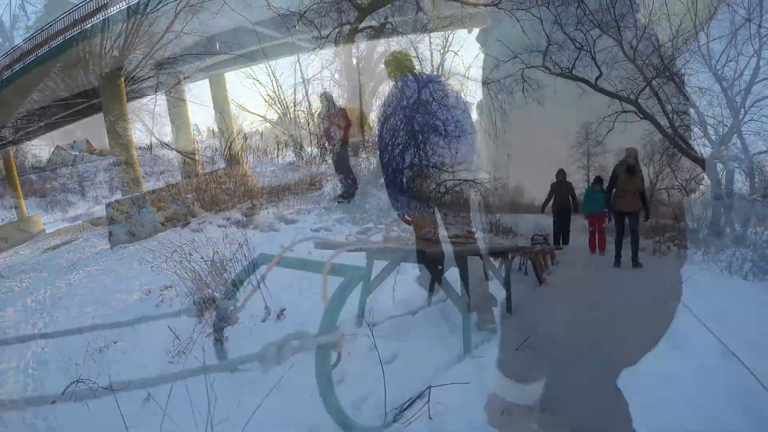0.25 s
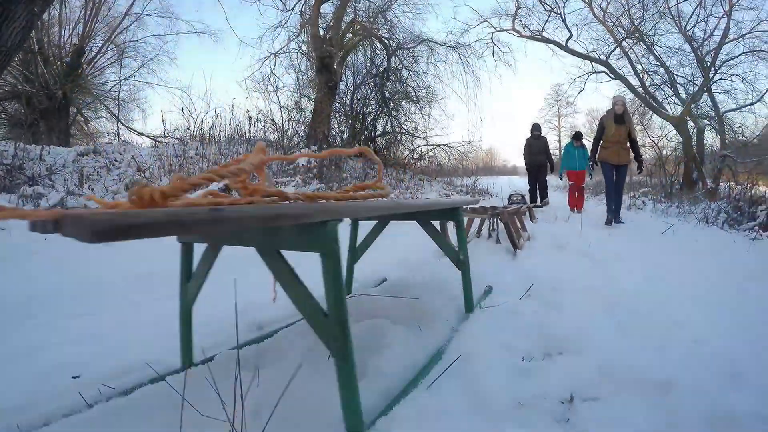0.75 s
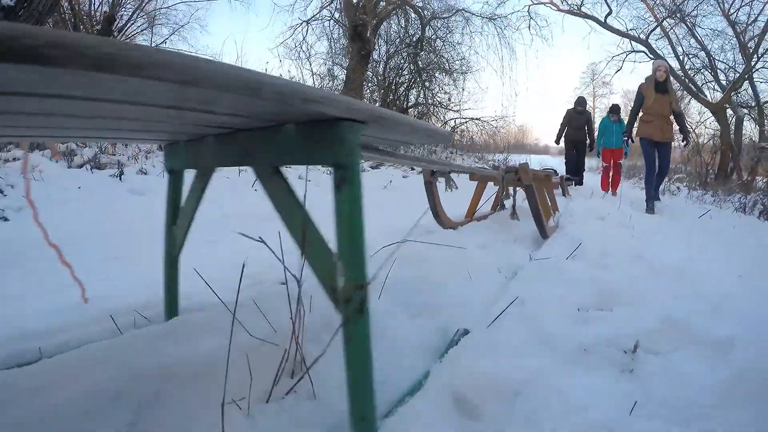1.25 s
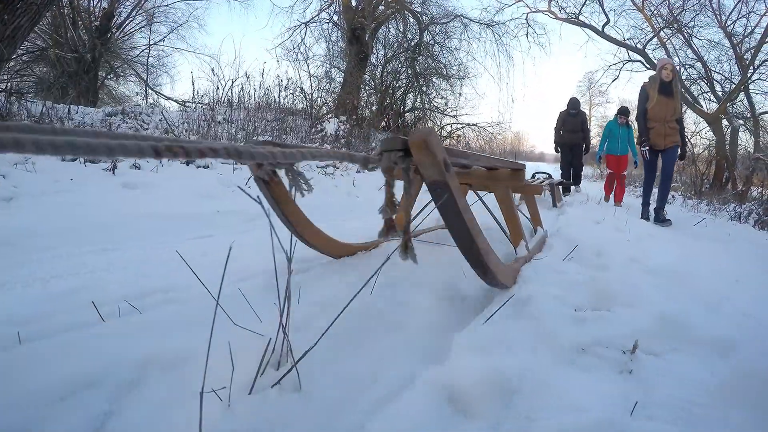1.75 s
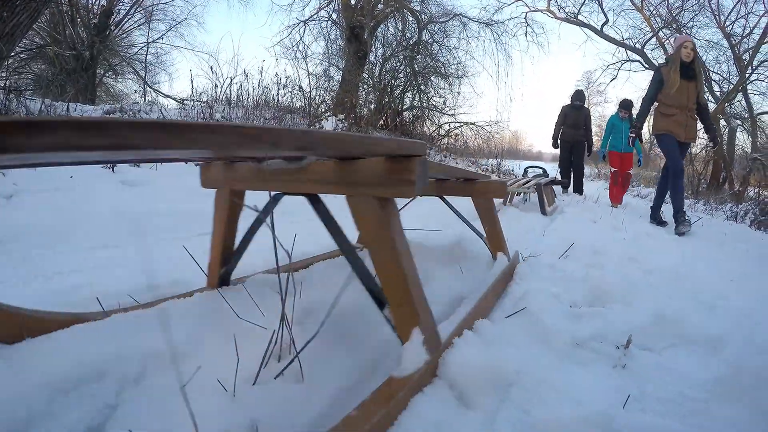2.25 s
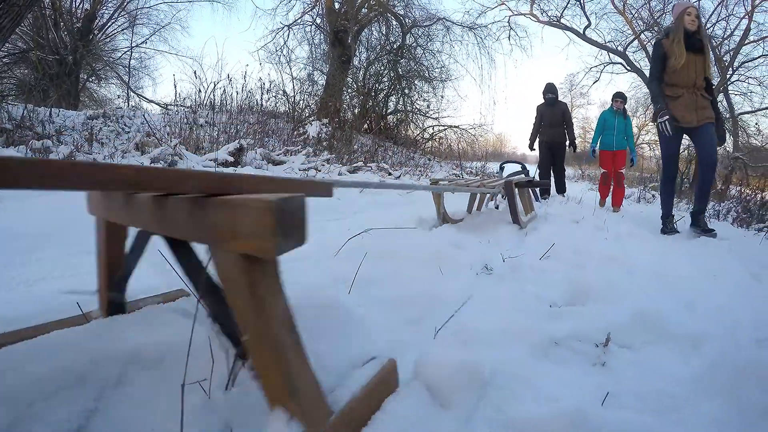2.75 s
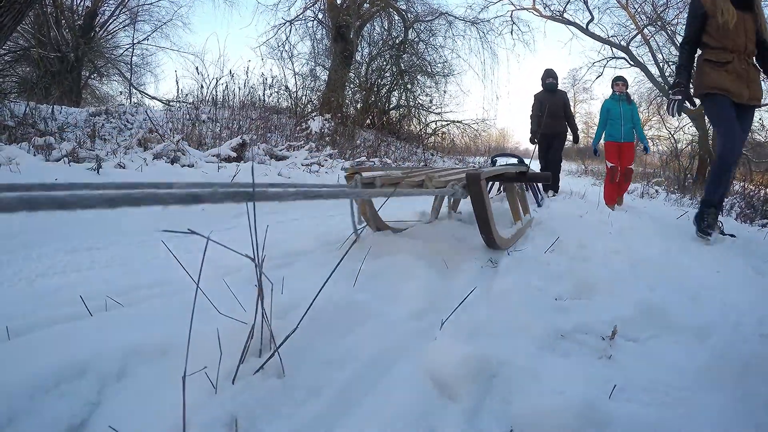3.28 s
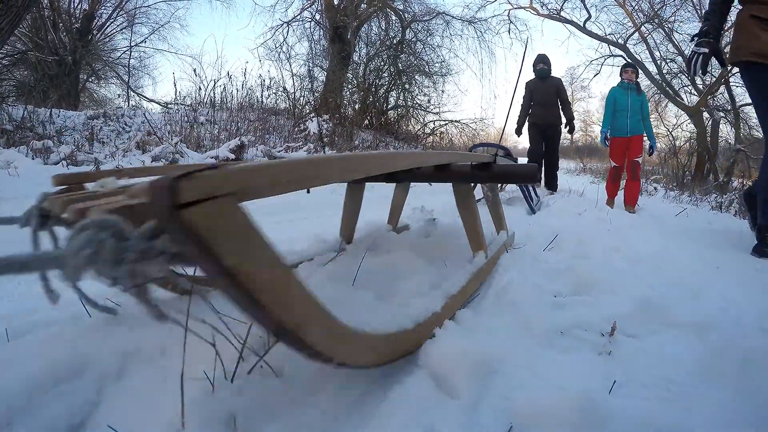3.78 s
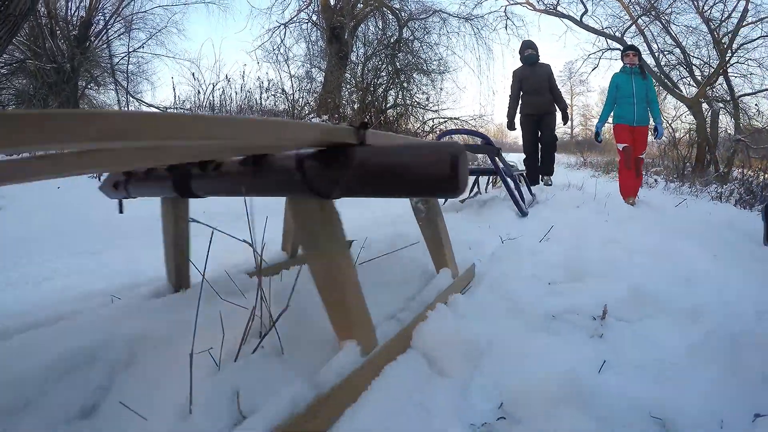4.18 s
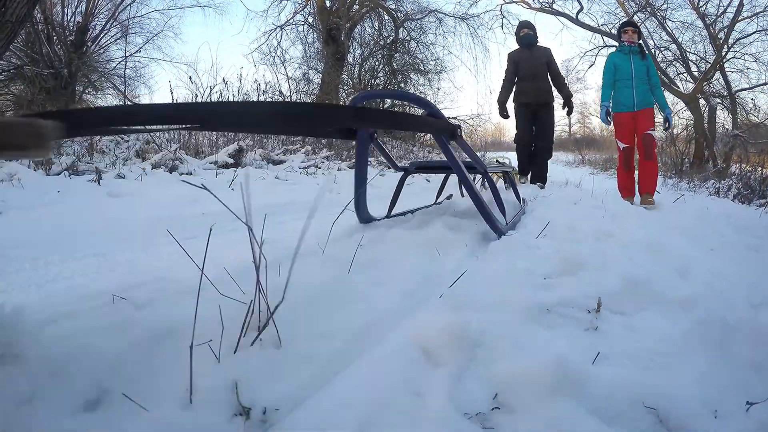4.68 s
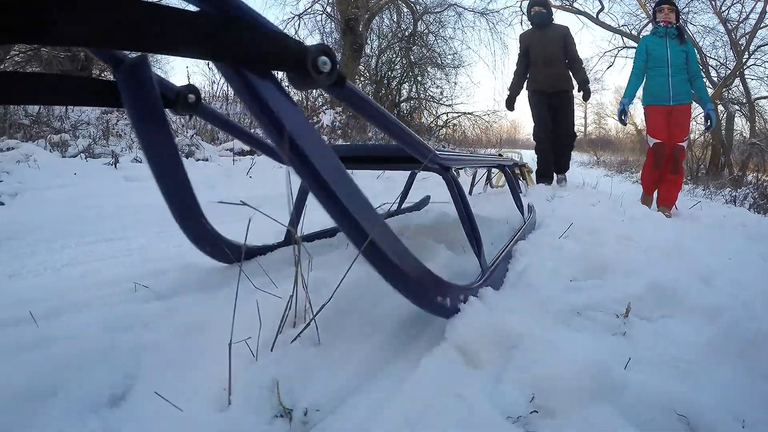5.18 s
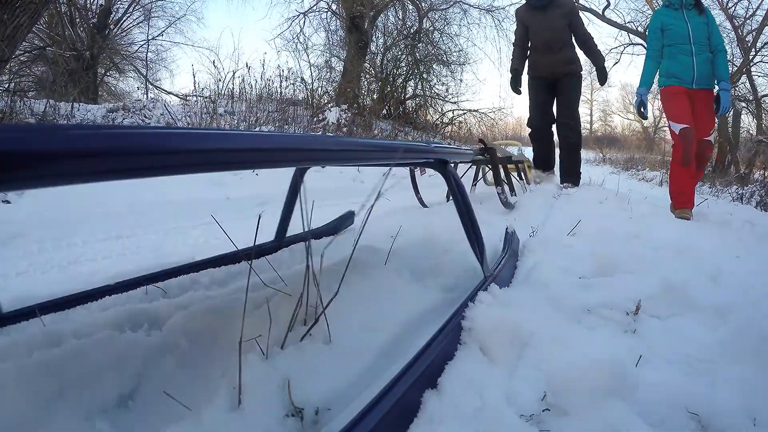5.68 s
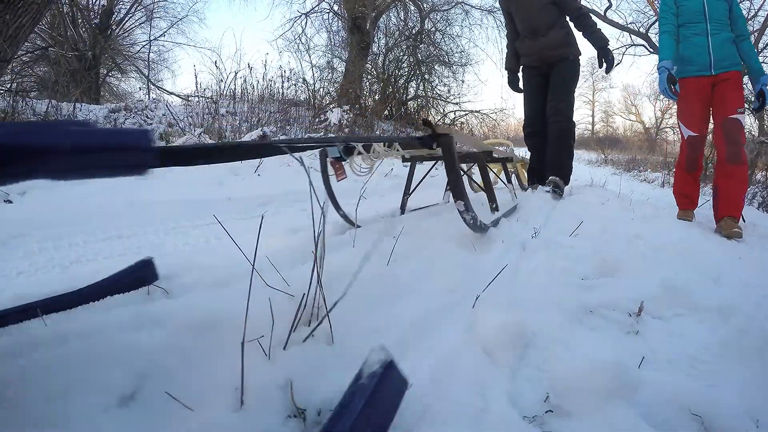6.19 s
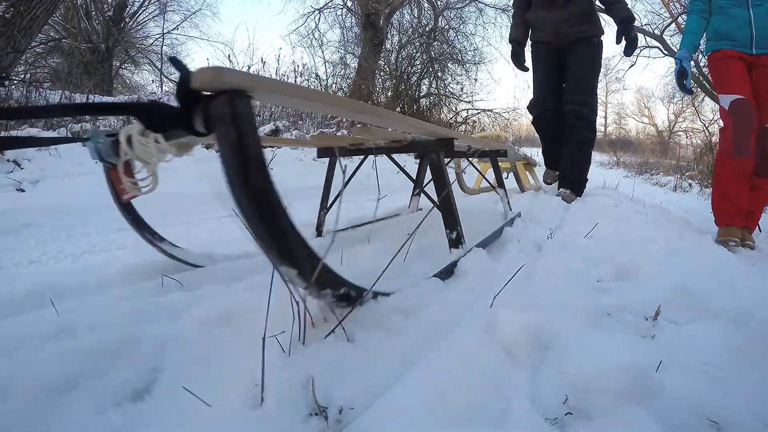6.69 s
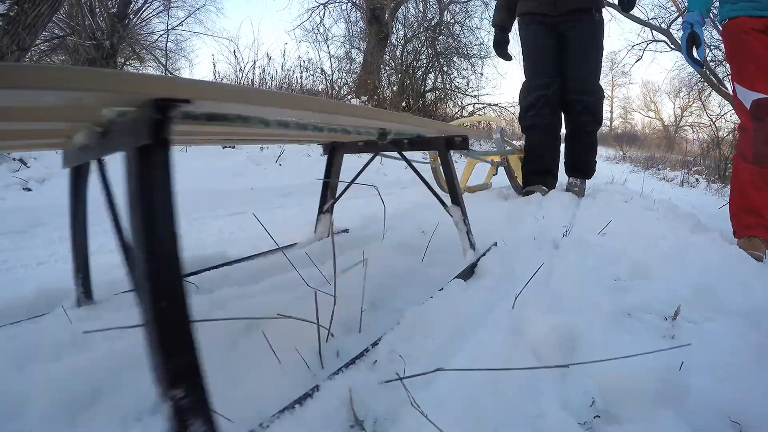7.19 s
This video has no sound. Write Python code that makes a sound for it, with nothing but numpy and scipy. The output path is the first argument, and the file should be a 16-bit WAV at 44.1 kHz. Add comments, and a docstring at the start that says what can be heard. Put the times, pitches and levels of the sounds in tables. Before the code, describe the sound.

A train of sleds drags across snow, grinding in uneven surges and crackling crunches over low bouncing rumble, with brief dropouts and one thin rising rasp.

```python
"""Snow grains crushed under runners and boots, heard from inside the closed plastic case of a small camera
that rides low over snow beside a train of sleds: noise forces shake the case, which rings in its own modes.
Below, the springy mount bounces and drums, with harder bumps; the contact breaks now and then.
Further off, runners hiss through the air as smooth noise bands. A low wavering sine hums at the start
and fades out; in a later pause a thin noise band rasps and glides upward."""
import sys
import numpy as np
from scipy import signal
from scipy.fft import rfft, irfft, next_fast_len
from scipy.io import wavfile
from scipy.ndimage import uniform_filter1d

SR = 44100
rng = np.random.default_rng(int(sys.argv[2]) if len(sys.argv) > 2 else 0)


def to_wav(sig):
    """Store sig (one row per channel, or 1-D mono) as 16-bit WAV at the path in sys.argv[1].

    Samples outside -1..1 are clipped; the rate is SR.
    """
    pcm = np.clip(np.atleast_2d(sig), -1, 1) * 32767
    pcm = np.round(pcm).astype(np.int16)
    wavfile.write(sys.argv[1], SR, pcm.T)  # frames by channels


N = 328104
T = np.arange(N) / SR  # time [s]
OPPOSED = np.array([[1], [-1]])  # opposite signs at the two microphone ports


def undb(db):
    """Amplitude factor of a level in dB."""
    return 10 ** (np.asarray(db) / 20)


def unit(x):
    """A signal scaled to rms 1."""
    return x / np.sqrt(np.mean(x ** 2))


def curves(table):
    """Columns of a table joined by straight lines in time."""
    times, *columns = np.transpose(table)
    return [np.interp(T, times, column) for column in columns]


def walk(rate):
    """Random levels, rms 1, held for 1 / rate seconds and smoothed twice over that span."""
    hold = int(SR / rate)
    steps = np.repeat(rng.standard_normal(N // hold + 1), hold)
    slewed = uniform_filter1d(uniform_filter1d(steps, hold), hold)
    return unit(slewed[:N])


def response(modes, sharp):
    """Complex gain of a set of modes; neighbours alternate in sign, sharp > 1 darkens the valleys."""
    f = np.fft.rfftfreq(next_fast_len(N + SR), 1 / SR) + 1e-3  # the offset avoids dividing by zero
    gain = 0
    for k, (hz, width, db) in enumerate(modes):
        detuning = (f / hz - hz / f) * hz / width
        gain = gain + (-1) ** k * undb(db) / (1 + 1j * detuning / sharp) ** sharp
    return gain


def ring(force, modes, sharp):
    """A force played through modes, scaled so that white noise of rms 1 comes out at rms 1."""
    gain = response(modes, sharp)
    size = next_fast_len(N + SR)
    rung = irfft(rfft(force, size) * gain, size)[..., :N]
    return rung / np.sqrt(np.mean(abs(gain) ** 2))


def knock(pushes, modes, sharp):
    """Single pushes played through modes, scaled so that a push of 1 rings with peak 1."""
    single = 1. * (T == 0)
    return ring(pushes, modes, sharp) / abs(ring(single, modes, sharp)).max()


def grains(rate, scatter_db, smear_s, bed):
    """Crushed grains: short noise puffs of unequal size over a smooth sliding hiss."""
    # the power of each puff scatters by up to scatter_db either way
    sizes = undb(2 * scatter_db * (2 * rng.random(N) - 1))
    hits = (rng.random(N) < rate / SR) * sizes
    power = signal.lfilter([1], [1, -np.exp(-1 / (smear_s * SR))], hits)
    return unit(np.sqrt(bed + power / power.mean()) * rng.standard_normal(N))


# moments when the contact with the snow breaks: (weakest moment [s], length [s], depth [dB])
CONTACT_LIFTS = [(0.704, 0.094, -10), (0.958, 0.099, -11), (1.091, 0.083, -5.5), (1.557, 0.17, -7.5),
                 (1.92, 0.25, -5), (2.475, 0.21, -20), (2.698, 0.089, -1), (2.786, 0.042, -6),
                 (2.892, 0.053, -11), (3.148, 0.05, -9), (3.299, 0.065, -7.5), (3.677, 0.15, -9.5),
                 (3.803, 0.07, -15.5), (3.887, 0.095, -19), (4.528, 0.061, -18), (4.558, 0.044, -6),
                 (4.649, 0.049, -4.5), (4.801, 0.018, -8), (4.962, 0.16, -7.5), (5.334, 0.3, -18.5),
                 (5.59, 0.065, -1.5), (5.746, 0.086, -13.5), (5.968, 0.091, -24), (6.04, 0.033, -8),
                 (6.304, 0.039, -20), (7.308, 0.11, -10.5)]
LIFT_FALL_SHARE = 0.55  # part of a lift spent falling


def lifts():
    """Loss of contact in dB: each lift falls to its weakest moment and climbs back."""
    loss_db = 0
    for s, length, db in CONTACT_LIFTS:
        start = s - length * LIFT_FALL_SHARE
        end = s + length * (1 - LIFT_FALL_SHARE)
        loss_db = loss_db + np.interp(T, [start, s, end], [0, db, 0])
    return loss_db


# boot scuffs that throw up fine powder: (loudest moment [s], length [s], swell [dB])
BOOT_SCUFFS = [(0.105, 0.087, 5), (0.337, .14, 7.5), (0.468, .1, 4), (.61, 0.12, 2.5), (0.835, 0.1, 1.5),
               (1.196, 0.26, 4), (1.55, 0.079, -2), (1.784, .12, 8), (2.2, 0.21, 9), (2.455, 0.092, 7),
               (7.38, .14, 5)]


def scuffs():
    """Swell in dB of the boot scuffs, each a smooth rise and fall."""
    swell_db = 0
    for s, length, db in BOOT_SCUFFS:
        swell_db = swell_db + db * np.cos(np.pi * np.clip((T - s) / length, -.5, .5)) ** 2
    return swell_db


# sudden crunches: (time [s], force level [dB], treble re the scrape's colour [dB])
SNOW_CRUNCHES = [(0.663, -17.5, -22), (0.735, -10.5, -25), (0.769, -14.5, -21), (0.824, -12, -1.5),
                 (.87, -22.5, 12), (1.012, -13, -4), (1.034, -7, -4), (1.174, -9, -2.5), (2.761, -15.5, -1),
                 (2.845, -17, -6), (2.888, -22, 0), (3.163, -33, -3), (3.725, -9, -6), (3.812, -15, -10),
                 (3.931, -13, -24), (4.811, -13, 10.5), (4.835, -4, 2.5), (5.063, -6, 1), (5.628, -12, -5),
                 (5.992, -24, -2), (6.021, -17, -4), (6.064, -27, 5.5), (6.096, -22.5, -1.5),
                 (6.155, -30, 4), (6.276, -28, 3), (6.289, -25, 3), (6.333, -16, -5), (6.615, -20, 8),
                 (6.739, -23, 0), (7.162, -25, 2)]
CRUNCH_T60_S, CRUNCH_RISE_S = 0.023, 0.0011


def crunches():
    """Force of the crunches on the low and high modes: noise that builds at once and dies away."""
    shapes = np.zeros((2, N))
    for s, db, treble_db in SNOW_CRUNCHES:
        start = int(s * SR)
        age = T[start:] - s
        shape = undb(db - 60 * age / CRUNCH_T60_S) * (1 - np.exp(-age / CRUNCH_RISE_S))
        shapes[:, start:] += shape * undb([[0], [treble_db]])
    return shapes / 3 * rng.standard_normal(N)  # 3: peak over rms of a noise puff


# drag of the snow on the case, also felt by the mount: (time [s], scrape [dB], bounce of the mount [dB])
SNOW_DRAG = [(0, -59.5, -34), (.3, -52.5, -34), (.65, -47, -28), (.69, -45, -13), (.75, -38, -18.5),
             (.9, -31.5, -23), (1.03, -28, -14.5), (1.2, -37.5, -24.5), (1.37, -52.5, -32),
             (1.78, -46.5, -31.5), (2.06, -42.5, -38.5), (2.36, -42.5, -37), (2.7, -50.5, -34),
             (3.04, -33, -26.5), (3.1, -39.5, -21), (3.32, -38.5, -27.5), (3.42, -35.5, -20.5),
             (3.75, -30.5, -19), (3.95, -31, -24.5), (4.21, -20.5, -16.5), (4.45, -30, -25.5),
             (4.6, -41.5, -29), (4.79, -31.5, -22.5), (4.83, -28.5, -22), (5.2, -32.5, -23),
             (5.55, -32.5, -27.5), (5.72, -39, -31), (5.8, -33.5, -24), (5.92, -36, -30.5),
             (6.03, -46.5, -30), (6.12, -61, -43.5), (6.28, -55.5, -37), (6.35, -39.5, -27),
             (6.8, -31, -27.5), (6.94, -36, -25.5), (6.98, -42.5, -28), (7.12, -51, -38),
             (7.44, -46, -33.5)]
# colour of the scrape as wood, steel and loose snow take turns: (time [s], ring near 2 kHz [dB re scrape],
# crisp grains [dB re scrape], drumming of the shell [dB re scrape], slow rocking of the mount [dB re bounce])
SCRAPE_COLOUR = [(0, -4, -2, -4, -8), (.4, 1, 6.5, -6, -12), (.85, -5.5, -3.5, -5, -6.5),
                 (1.03, -1.5, -7, 1, -10), (1.25, 1, 3.5, 2, -8.5), (1.7, -3.5, -2.5, 6.5, -6),
                 (2.2, -10.5, -17, -2.5, 3.5), (2.55, -7, -6.5, 5, -2.5), (3.3, -6, -9.5, 11, -15),
                 (3.75, -10, -14.5, 6.5, -19), (4.2, -12, -12, -1, -14), (4.65, -8.5, -7, 4, -10),
                 (4.85, -4, -3.5, -0.5, -15), (5.15, -1, -5, 2.5, -14), (5.55, -0.5, -9, 1.5, -17),
                 (6.2, -5.5, -6.5, 5, -18), (6.5, -3, -7.5, 6.5, -20), (6.8, 5.5, -6, 1.5, -14),
                 (7.1, 3.5, -4, 4, -14), (7.44, 3.5, -2.5, -0.5, -8)]
# hollow tone of the case: (time [s], level [dB re scrape])
HOLLOW_LEVEL = [(0, -10.5), (2.2, -10.5), (3.1, -4), (4.4, -9.5), (5.2, -6), (6.1, -11), (6.5, -6),
                (7.44, -10.5)]
# modes of the case from low to high: (frequency [Hz], nominal width [Hz], relative gain [dB])
HOLLOW_MODES = [(498, 32.5, -9.5), (636.5, 24.2, -3), (801.5, 111, -7.5), (929, 197, -9)]
LOW_MODES = [(988, 50.3, 6), (1185, 116, -4), (1421, 56, 4), (1508.4, 56, 3.5), (1657, 114, 2)]
RING_MODES = [(1822, 68, 1), (2022, 59, 4.5), (2230, 117, -2.5), (2336, 103, -7)]
CRISP_MODES = [(2549, 126, 17), (3190, 129, 17.5), (3568, 232, 14.5), (4068, 345, 11.5), (4200, 50, -19),
               (4540, 220, -9), (4830, 200, -30)]
TOP_MODES = [(5490, 270, 2.5), (6120, 300, 8.5), (6900, 690, -6), (8100, 390, -2.5), (10800, 800, -7),
             (13200, 360, -8), (13200, 6100, -13.5)]
POWDER_DB, POWDER_PER_CRISP = -13, 1.08  # fine powder brightens with the crisp grains


def snow():
    """One uneven friction force shakes every mode of the case; the two ports differ slightly."""
    scrape_db = curves(SNOW_DRAG)[0] + lifts()
    hollow_db = curves(HOLLOW_LEVEL)[0]
    ring_db, crisp_db, *_ = curves(SCRAPE_COLOUR)
    powder_db = POWDER_DB + POWDER_PER_CRISP * crisp_db + scuffs() + 1.5 * walk(8.3)
    crush = grains(rate=150, scatter_db=5.0, smear_s=0.0062, bed=0.78)
    port_noise = rng.standard_normal(N) * OPPOSED
    low, high = crunches()
    # modes, level [dB], crunch force, sharpness, port difference [dB]
    families = ((HOLLOW_MODES, hollow_db, low, 1.6, -30),
                (LOW_MODES, 0, low, 1.6, -31),
                (RING_MODES, ring_db, high, 1.6, -29),
                (CRISP_MODES, crisp_db, high, 1.2, -26),
                (TOP_MODES, powder_db, high, 2.6, -18))
    out = 0
    for modes, db, crunch, sharp, port_db in families:
        # the contact spot wanders, so each family of modes creaks louder and softer by itself
        slide = undb(scrape_db + 0.97 * walk(25))
        force = slide * (crush + undb(port_db) * port_noise) + crunch
        out = out + undb(db) * ring(force, modes, sharp)
    return out


# modes of the springy mount, then of the shell: (frequency [Hz], nominal width [Hz], relative gain [dB])
MOUNT_MODES = [(33.6, 26.4, -5), (59.1, 18.06, 4), (74.5, 19.9, -5.5)]
SHELL_MODES = [(123, 41.5, 2), (190.6, 37.7, 3.5), (317, 15, -13.5), (255, 44, -8)]
# bumps against the mount: (time [s], peak [dB], knock on the shell [dB re peak])
MOUNT_BUMPS = [(0.037, -15.5, -8.5), (0.67, -6, -12.5), (0.957, -5.5, -22), (3.385, -14.5, -23),
               (3.769, -13, -3), (4.028, -13, -15), (4.164, -12.5, -4.5), (4.28, -9, -23), (4.809, -13, -8),
               (4.864, -11, -23), (5.053, -19, -29), (5.776, -20, -2), (6.707, -22.5, 3)]
BOUNCE_LIFT_SHARE = 0.41  # part of a lift's depth felt by the mount


def bounce_and_rock(bounce_db):
    """The mount sways in its modes under random jolts and rocks slowly in its lowest one."""
    sway = ring(rng.standard_normal(N), MOUNT_MODES, sharp=1.27)
    # friction feeds a weak swing and brakes a strong one, so its size is steadier than chance
    size = np.sqrt(uniform_filter1d(sway ** 2, SR // 30) + 0.039)
    bounce = undb(bounce_db) * unit(sway / size ** 0.3)
    rock_db = bounce_db + curves(SCRAPE_COLOUR)[3]
    rock = undb(rock_db) * ring(rng.standard_normal(N), MOUNT_MODES[:1], sharp=2.64)
    return bounce + rock


def drumming(drum_db):
    """Uneven jolts drum on the modes of the shell, almost alike at the two ports."""
    jolts = grains(rate=54, scatter_db=4.0, smear_s=0.0043, bed=1.4)
    port_noise = undb(-46.5) * rng.standard_normal(N) * OPPOSED
    return ring(undb(drum_db) * (jolts + port_noise), SHELL_MODES, sharp=4.14)


def bumps():
    """Single pushes set the mount and the shell ringing, and the case raps along."""
    mount_push, shell_push = np.zeros((2, N))
    for s, db, shell_db in MOUNT_BUMPS:
        mount_push[int(s * SR)] = undb(db)
        shell_push[int(s * SR)] = undb(db + shell_db)
    rap = undb(-15) * knock(shell_push, HOLLOW_MODES + LOW_MODES, sharp=3.3)
    thump = knock(mount_push, MOUNT_MODES, sharp=1.196)
    return rap + thump + knock(shell_push, SHELL_MODES, sharp=1.8)


def mount():
    """Jolts keep the springy mount bouncing and drum on the shell; bumps are single pushes."""
    scrape_db, bounce_db = curves(SNOW_DRAG)
    contact_db = lifts()
    drum_db = scrape_db + contact_db + curves(SCRAPE_COLOUR)[2]
    return bounce_and_rock(bounce_db + BOUNCE_LIFT_SHARE * contact_db) + drumming(drum_db) + bumps()


# runners further off, through the air, and the swish of boots and clothing: (time [s], hiss [dB], swish near
# 7.5 kHz [dB re hiss])
FAR_LEVELS = [(0, -64.5, -10), (.3, -52.5, -16), (1.4, -50.5, -21), (2.0, -57.5, -16), (2.6, -53.5, -17),
              (3.5, -55, -19), (4.5, -49, -20), (5.4, -48.5, -16), (6.3, -50.5, -10), (6.9, -56, -13),
              (7.44, -56, -21)]
# broad bands of the hiss, then of the swish: (frequency [Hz], nominal width [Hz], relative gain [dB])
AIR_BANDS = [(1780, 890, 11.5), (3140, 2220, 9), (5040, 2000, -9.5), (10500, 15000, -18)]
SWISH_BAND = [(7550, 780, 0)]
SCUFF_AIR_SHARE = 0.66  # part of the scuff swell that also lifts the far hiss


def far_runners():
    """Airborne hiss of runners further off, smoother than what comes through the case, with the swish of boots
    and clothing."""
    hiss_db, swish_db = curves(FAR_LEVELS)
    hiss_db = hiss_db + SCUFF_AIR_SHARE * scuffs()
    mid, side, swish_noise = rng.standard_normal((3, N))
    hiss = ring(mid + undb(-28.5) * side * OPPOSED, AIR_BANDS, sharp=1.2)
    swish = ring(swish_noise, SWISH_BAND, sharp=1.8)
    hiss = undb(hiss_db + 2.0 * walk(3.44)) * hiss
    return hiss + undb(hiss_db + swish_db + 1.0 * walk(13)) * swish


HUM_HZ, HUM_RMS_DB, HUM_RISE_S, HUM_END_S, HUM_FADE_S = 56.7, -27.5, 0.027, 0.59, 0.032


def hum():
    """A nearly pure low tone whose pitch wavers a little."""
    fade = np.interp(T, [0, HUM_RISE_S, HUM_END_S, HUM_END_S + HUM_FADE_S], [0, 1, 1, 0])
    pitch_hz = HUM_HZ * (1 + 0.056 * walk(5.36))
    tone = np.sqrt(2) * np.sin(2 * np.pi * np.cumsum(pitch_hz) / SR)
    return undb(HUM_RMS_DB) * fade * tone


RASP_S = (5.9, 5.99, 6.32)  # start, peak and end
RASP_FROM_HZ, RASP_TO_HZ = 2800, 3340
RASP_REACH_HZ = 680  # the band falls to nothing about this far from its centre
RASP_DB = -51  # rms before the swell and fade


def rasp():
    """A thin band of noise whose centre glides upward: two smoothed noises ride on a gliding carrier."""
    centre_hz = np.interp(T, RASP_S[::2], [RASP_FROM_HZ, RASP_TO_HZ])
    span = int(SR / RASP_REACH_HZ)
    a, b = uniform_filter1d(uniform_filter1d(rng.standard_normal((2, N)), span), span)
    phase = 2 * np.pi * np.cumsum(centre_hz) / SR
    band = unit(a * np.cos(phase) + b * np.sin(phase))
    return undb(RASP_DB) * np.interp(T, RASP_S, [0, 1, 0]) ** .5 * band


def scene():
    """Close snow and mount, runners further off, the rasp and the hum, summed at the microphone ports."""
    return snow() + mount() + far_runners() + rasp() + hum()


def record(dry):
    """The camera cuts the top steeply above 15350 Hz."""
    top_cut = signal.ellip(10, .2, 80, 15350, fs=SR, output="sos")
    return signal.sosfilt(top_cut, dry)


dry = scene()
out = record(dry)
to_wav(out)
```